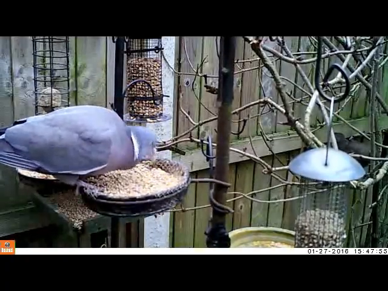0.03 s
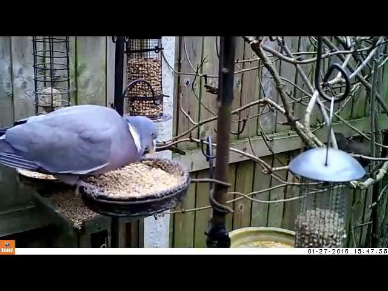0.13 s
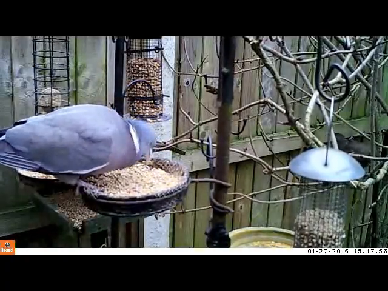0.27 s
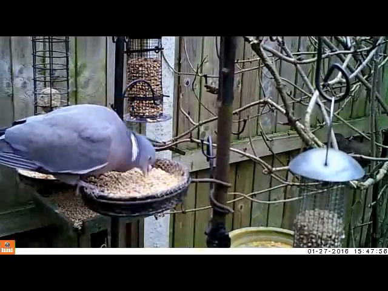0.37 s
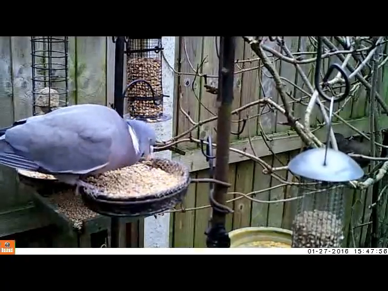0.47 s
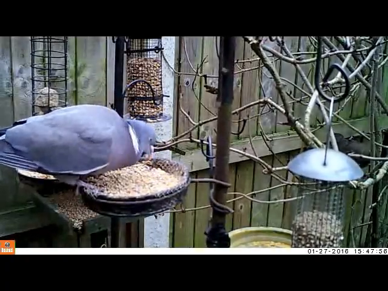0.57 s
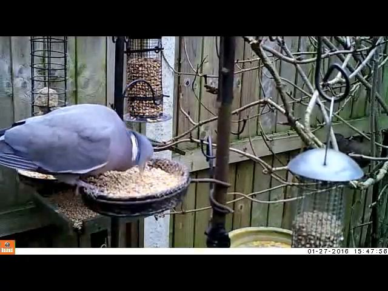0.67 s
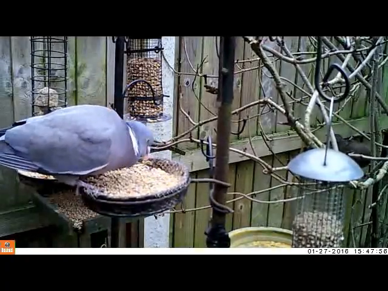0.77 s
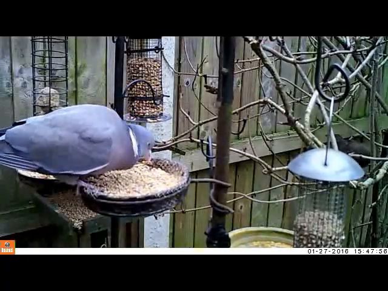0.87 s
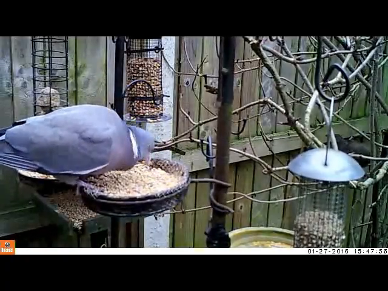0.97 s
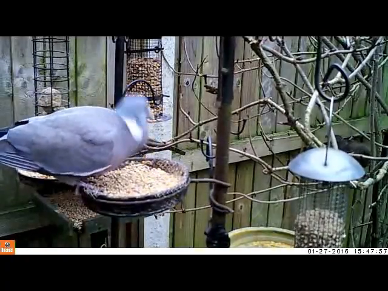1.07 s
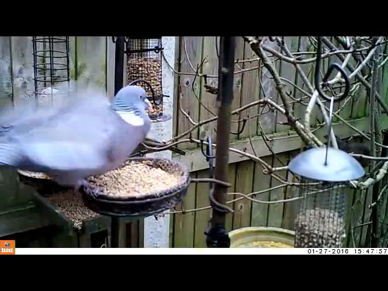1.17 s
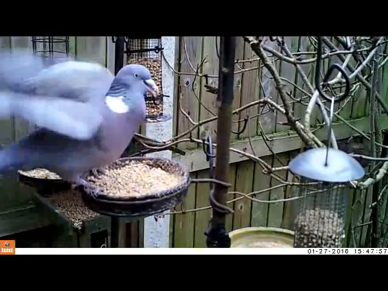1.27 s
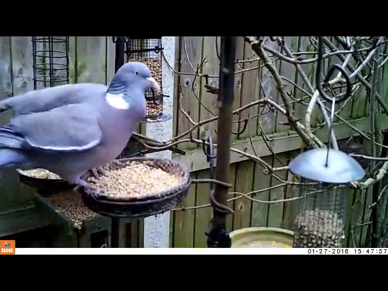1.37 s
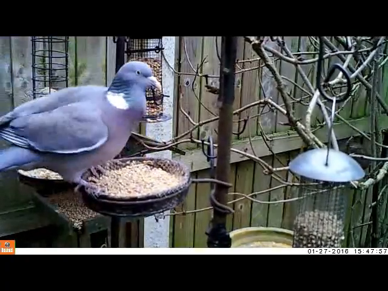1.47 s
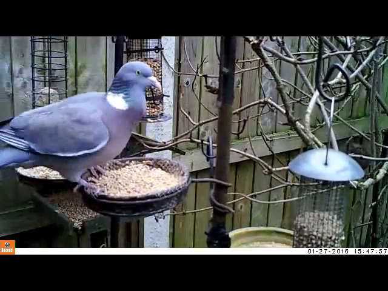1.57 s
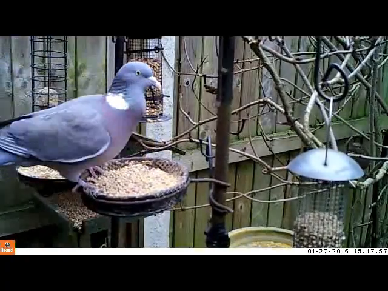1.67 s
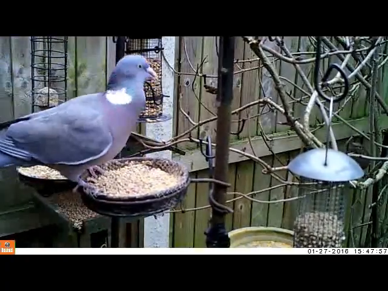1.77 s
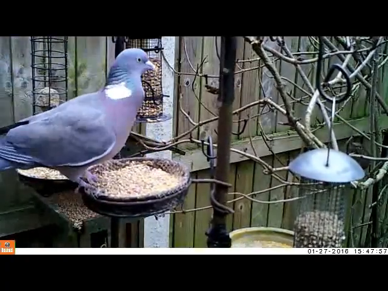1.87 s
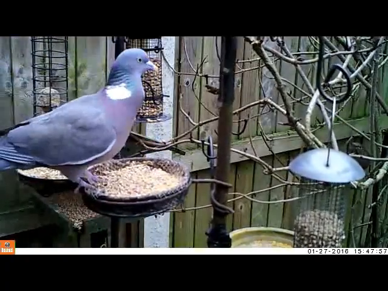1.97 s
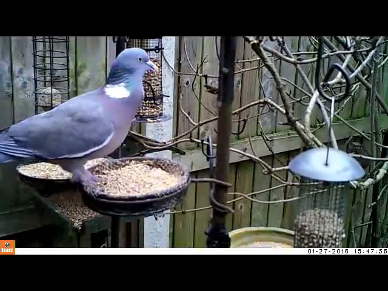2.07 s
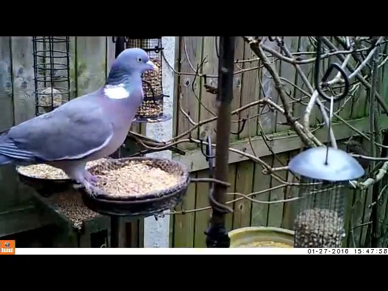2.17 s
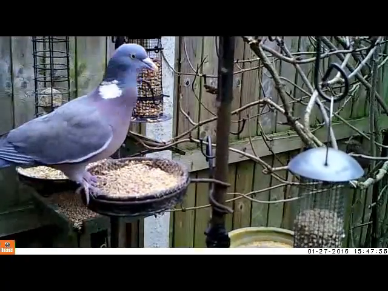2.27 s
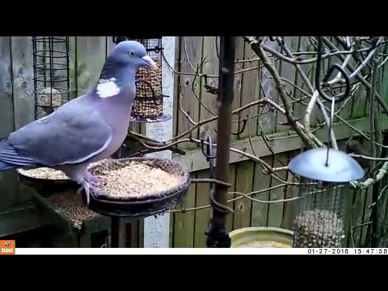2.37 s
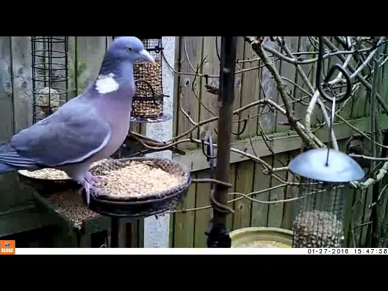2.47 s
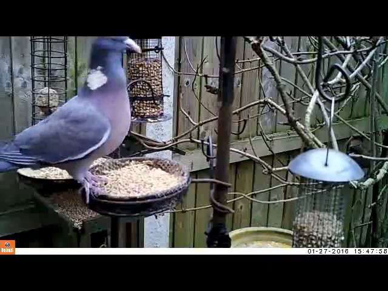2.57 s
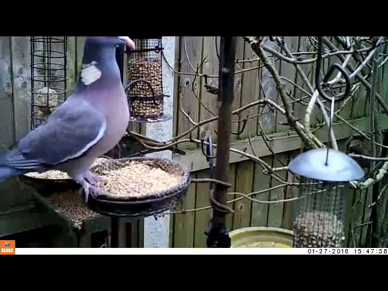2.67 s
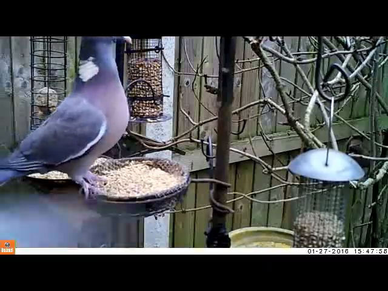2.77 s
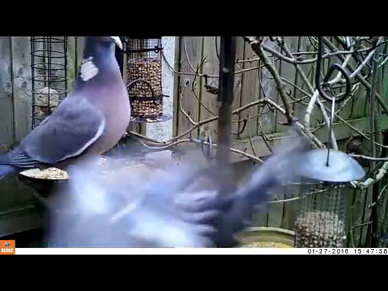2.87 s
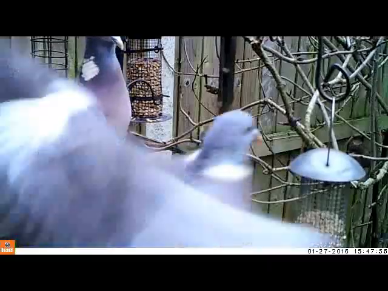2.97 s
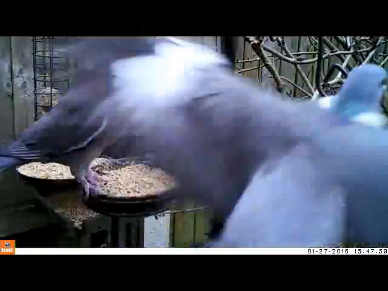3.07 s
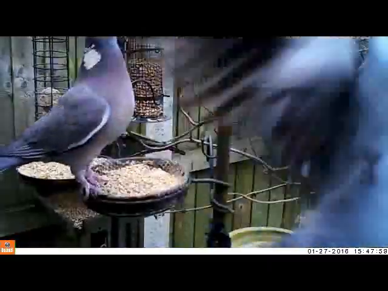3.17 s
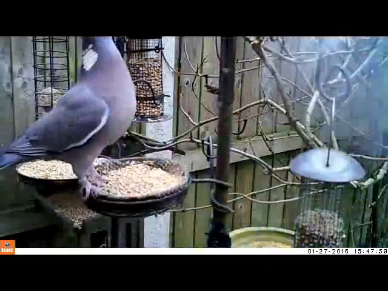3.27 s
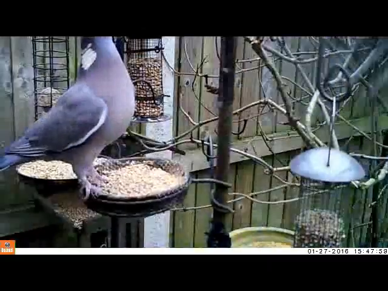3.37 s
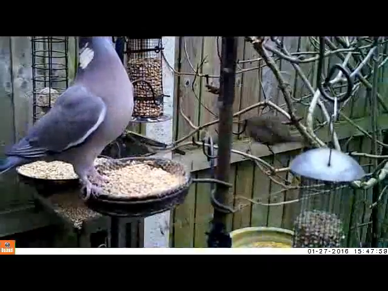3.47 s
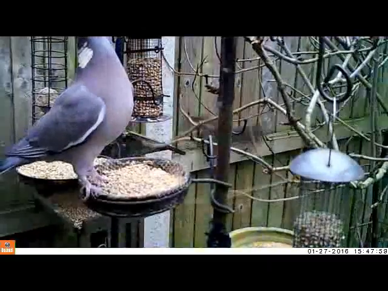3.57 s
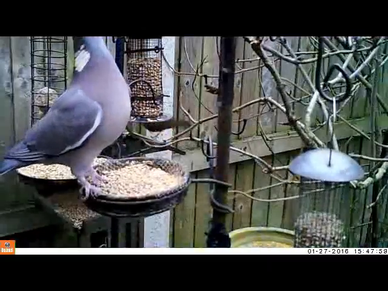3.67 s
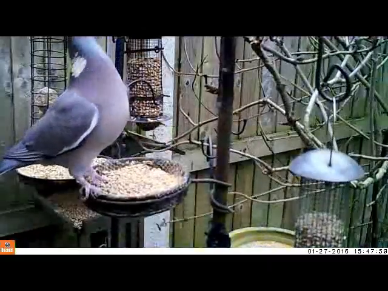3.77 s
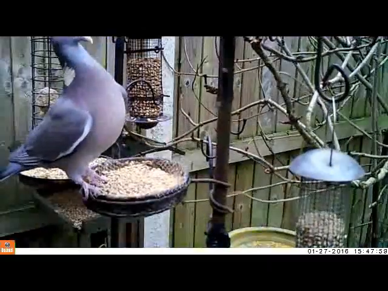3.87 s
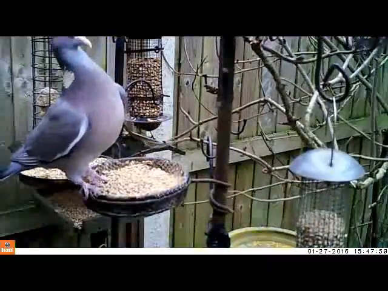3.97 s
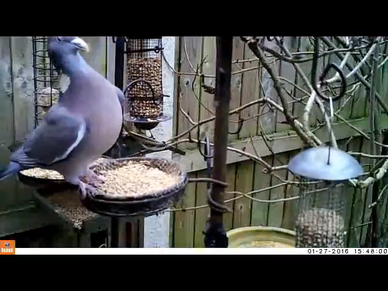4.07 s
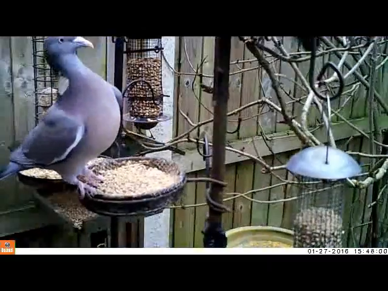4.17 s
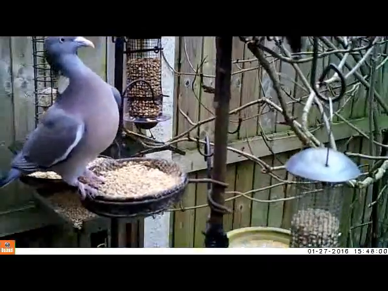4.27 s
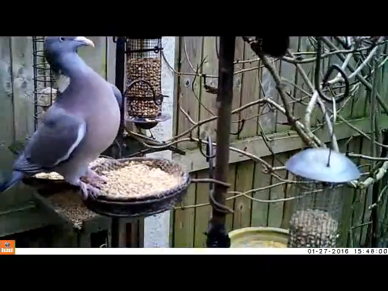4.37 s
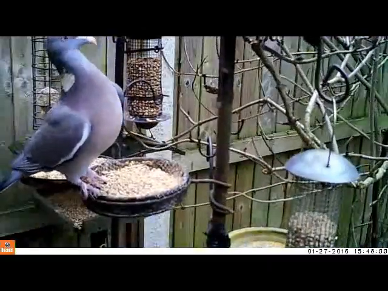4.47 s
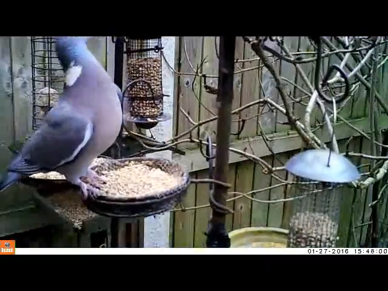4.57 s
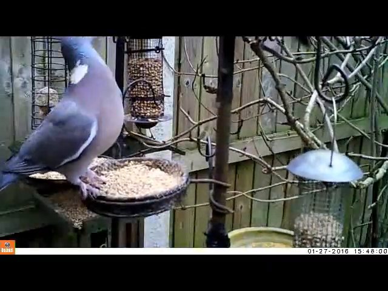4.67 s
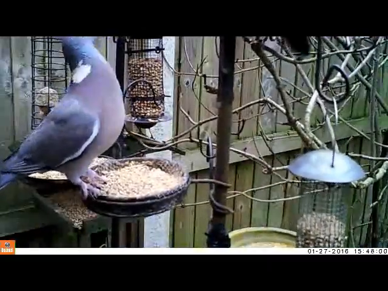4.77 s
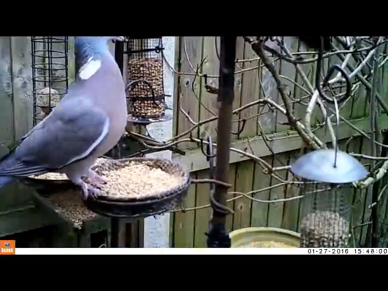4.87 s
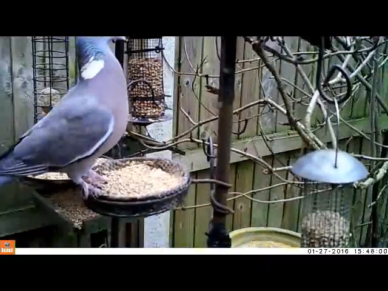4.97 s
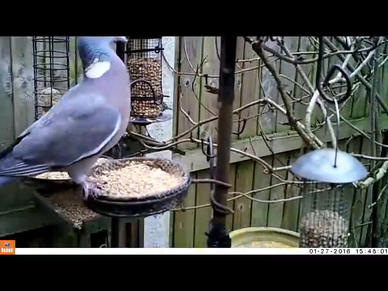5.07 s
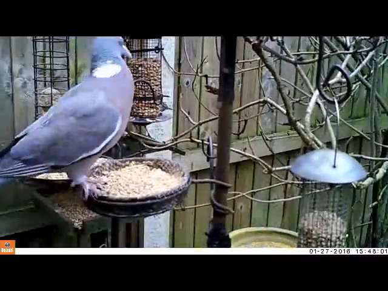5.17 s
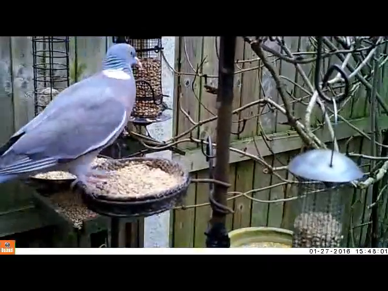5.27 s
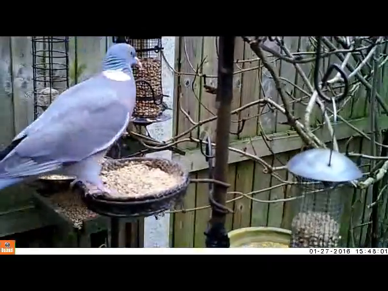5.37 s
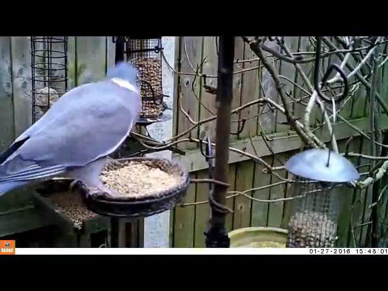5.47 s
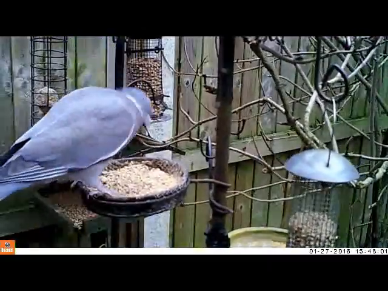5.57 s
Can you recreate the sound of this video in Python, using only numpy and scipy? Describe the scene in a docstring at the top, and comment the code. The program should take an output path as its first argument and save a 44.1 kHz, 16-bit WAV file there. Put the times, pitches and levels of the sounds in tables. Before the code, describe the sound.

A quiet fenced back garden, with steady faint distant town rumble and soft hiss. For the first second a wood pigeon near the microphone pecks seed, making only tiny dry ticks and grainy shifts. From about 1.1 seconds it flaps for balance: quick, soft wingbeats, eight or nine per second, each a breathy swish, papery feather rustle and low air thump, with brief fluttery tones. Firmer claw clicks and scattering seed start near 1.6 seconds. Around 2.7 to 3.6 seconds the strokes become heaviest as a second pigeon passes very close, buffeting the microphone; wing claps crack sharply from 3.0 to 3.75, strongest near 3.3, with crisp quill rattles and hollow slaps. The beats fade by about 4.2. Light claw and seed ticks continue to the end at about 5.5, the wire rim ringing slightly, while a small far bird gives faint, thin high chirps around 4.7 to 5.1.

```python
"""Pigeons at a garden feeder

Close to the microphone a wood pigeon softly pecks seed from a tray, then flaps to keep its balance.
A second pigeon flies close past and away, clapping its wings: strokes are gusts plus shaped noise,
rustle and claps are showers of tiny clicks. Claws tick on the tray, whose wire rim rings as resonators.
Farther off a small bird chirps in wavering sines, over steady noise for distant town rumble and hiss."""
import sys
import numpy as np
from scipy import signal
from scipy.fft import next_fast_len
from scipy.io import wavfile
from scipy.ndimage import uniform_filter1d

SR = 44100
rng = np.random.default_rng(int(sys.argv[2]) if len(sys.argv) > 2 else 0)


def int16_out(signal):
    """Quantize to a 16-bit WAV file."""
    q = np.round(np.clip(np.atleast_2d(signal).T, -1, 1) * 32767)
    wavfile.write(sys.argv[1], SR, q.astype(np.int16))


N = 248724
TIME = np.arange(N) / SR
EDGE_HZ = 10480  # upper edge of the microphone's band

# Spectra are relative: each coloured noise is scaled to rms 1 afterwards.
# distant garden background: (frequency [Hz], density [dB per Hz])
GARDEN_SPECTRUM = [(8.8, -17.5), (15, 8.5), (96, -7.5), (245, -17), (369, -21.5), (816, -28), (910, -26),
                   (1100, -27.5), (1570, -32), (1710, -32.5), (3030, -40.5), (3880, -40.5), (5700, -42),
                   (8820, -42), (10400, -51.5), (13500, -69), (22000, -120)]
# decay of reflections from fence and walls: (frequency [Hz], t60 [s])
YARD_DECAY = [(200, 0.25), (1500, 0.083), (6000, 0.44), (10000, 0.2)]
# thin notes of a small bird farther off:
# (centre time [s], pitch [Hz], level [dB], length [s], pitch drop either side [share; negative rises])
CHIRPS = [(4.686, 5080, -67, .05, 0.095), (4.846, 8200, -53.5, 0.027, -0.0064),
          (4.85, 8970, -57.5, 0.031, .01), (4.894, 4160, -65.5, 0.031, -.03),
          (4.915, 4510, -53.5, .018, .02), (4.97, 5000, -74, .09, .005), (5.12, 9100, -70, .048, .04)]
# beak, claws and seed ticking on the tray, before the tray's level:
# (time [s], tick [dB], shifting seed [dB], seed t60 [s], centre frequency [Hz])
TICKS = [(.099, -69, -68, 0.5, 6840), (0.164, -55, -63, 0.1, 6560), (.276, -70, -69, 0.14, 8000),
         (.4126, -69, -77, .06, 8500), (.4689, -62, -70, .06, 7000), (.560, -70, -64, 0.11, 8000),
         (0.691, -66, -75, .04, 5500), (0.9567, -59, -62, 0.078, 6140), (1.0776, -62, -62, .14, 6200),
         (1.6411, -40, -42, .08, 7500), (1.7623, -49, -41, 0.082, 6900), (1.965, -47, -39.5, 0.06, 7500),
         (2.3528, -45.5, -54, .04, 6960), (2.3670, -43, -42.5, 0.074, 6460), (2.6412, -46, -50, 0.06, 7000),
         (2.914, -46, -46, 0.064, 7100), (2.927, -53, -39.5, 0.072, 7300), (3.935, -54, -47.5, 0.092, 7000),
         (4.052, -52, -45, .05, 7000), (4.179, -52, -47, 0.12, 7140), (4.334, -49.5, -53, 0.094, 6270),
         (4.4407, -43, -43.5, 0.049, 9350), (4.442, -43, -57, 0.38, 4720), (4.5359, -48, -57, 0.14, 5000),
         (4.5805, -56, -65, 0.044, 7500), (4.7990, -61, -55.5, .14, 7260), (4.8370, -63, -53, 0.26, 7100),
         (4.913, -47, -59, 0.09, 5450), (4.9400, -54, -63, 0.2, 6060), (5.0233, -57, -69, .04, 8500),
         (5.062, -56, -56.5, 0.17, 4970), (5.246, -60, -56.5, 0.14, 5260), (5.374, -63, -58, 0.11, 4770),
         (5.387, -51, -56, .09, 7100), (5.4086, -52, -53.5, 0.083, 7700), (5.4620, -57, -63, .03, 8000),
         (5.4827, -50, -53, 0.094, 6850)]
# spectrum of a husk: (frequency [share of the tick's centre], density [dB per Hz])
HUSK = [(1 / 10, -24), (0.33, -15), (0.68, -7), (1, 0), (1.4, -6), (2, -13)]
# ringing of the tray's wire rim: (frequency [Hz], gain at resonance [dB], t60 [s])
RIM_MODES = [(2400, -4, .06), (3520, -3, 0.046), (4700, -2, 0.22), (6390, 7.5, 0.027)]
# wing strokes; rustle and rush are before their layers' levels:
# (push time [s], air push [dB], push length [s], swish [dB], rustle [dB], air rush [dB], sweep length [s])
STROKES = [(1.116, -26.0, 0.016, -61, -54.5, -70, 0.032), (1.24, -19.5, 0.013, -44, -51, -65, 0.05),
           (1.348, -17.5, 0.011, -40.5, -49.0, -58, 0.043),
           (1.454, -15.5, 0.012, -42.5, -47.5, -49.5, 0.074), (1.57, -18.5, 0.017, -50.5, -49, -54, 0.071),
           (1.711, -19.5, 0.013, -44, -49.5, -59, 0.058), (1.843, -21.5, 0.018, -52.5, -55.5, -56.0, 0.1),
           (1.94, -21.5, 0.011, -50.5, -52, -67, 0.037), (2.043, -21, 0.0069, -51.5, -50.0, -55, 0.08),
           (2.155, -20.5, 0.0092, -51.5, -48, -58.5, 0.073),
           (2.278, -24.0, 0.015, -60, -51.5, -55.0, 0.087), (2.418, -24, 0.016, -58, -52.5, -57, 0.038),
           (2.569, -19.5, 0.018, -47.5, -52.5, -64, 0.041),
           (2.702, -14.5, 0.018, -46.5, -49.0, -54.5, 0.048), (2.832, -16, 0.022, -45.5, -49.0, -57, 0.046),
           (2.95, -11.5, 0.015, -51.5, -51.5, -56, 0.015), (3.069, -15.5, 0.018, -50, -50, -66, 0.09),
           (3.183, -12.5, 0.016, -50, -51.5, -58.5, 0.018), (3.269, -12.5, 0.0066, -44, -49.5, -62.5, 0.11),
           (3.37, -14, 0.0067, -41.5, -45.5, -54.5, 0.057), (3.477, -15, 0.0092, -43, -48, -66, 0.067),
           (3.582, -21.5, 0.012, -46.0, -52, -59.5, 0.084), (3.698, -21.0, 0.01, -47.0, -50.5, -57.5, 0.1),
           (3.795, -33, 0.012, -57, -52, -58.5, 0.089), (3.853, -22.5, 0.015, -54, -52.5, -55, 0.025),
           (3.978, -25, 0.015, -60, -56.5, -61, 0.037), (4.09, -24.5, 0.013, -55, -54, -59, 0.076),
           (4.22, -26.0, 0.023, -60, -60.5, -64, 0.078)]
# eddies the passing bird leaves at the microphone: (time [s], level [dB], length [s])
EDDIES = [(3.291, -13, 0.019), (3.396, -12.5, 0.015), (3.504, -15, 0.0195), (3.621, -19, 0.017),
          (3.734, -18.5, 0.019)]
# low buffeting at the microphone: (frequency [Hz], density [dB per Hz])
BUFFET = [(10, -19.0), (40, 13.5), (110, -10.5), (250, -20), (1000, -66.0)]
# swish of the moving wing: (frequency [Hz], density [dB per Hz])
SWISH_SPECTRUM = [(60, 9.5), (180, -2), (300, -4), (700, -5.5), (1100, -5.5), (1700, -13.5), (3200, -16),
                  (6000, -17), (10300, -29)]
# air rushing through the spread wings: (frequency [Hz], density [dB per Hz])
RUSH_SPECTRUM = [(100, -15.5), (300, -1), (550, 1.5), (900, 1.5), (1250, -8.5), (1700, -8.5), (3000, -7),
                 (8000, -23.5)]
# loose rustle between strokes, before the rustle's level: (time [s], level [dB])
RUFFLE = [(.97, -71), (1.2, -50), (2.2, -55), (2.48, -63), (3.0, -59), (3.7, -59.5), (4.2, -63.5),
          (4.62, -68.5)]
# feather rustle: (frequency [Hz], density [dB per Hz])
FEATHER_SPECTRUM = [(150, -24.5), (400, -7.5), (800, -8), (1500, -9.5), (2400, -10.5), (3100, -8.5),
                    (4200, -7), (5300, -7), (6200, -2), (8000, 0.5), (10300, -9)]
# feathers that flutter or whistle briefly: (centre time [s], pitch [Hz], level [dB], length [s])
FLUTTERS = [(1.376, 370, -54, 0.037), (1.409, 3080, -56, 0.044), (1.441, 1205, -49, 0.056),
            (1.541, 3030, -56, 0.037), (1.733, 468.5, -51, 0.048), (1.811, 636, -54, 0.035),
            (1.931, 597, -51, 0.029), (2.137, 3220, -59, .05), (2.243, 2970, -60, 0.043),
            (2.272, 795, -52.5, .025), (2.4, 745, -56, 0.05), (2.816, 3080, -56.5, 0.039),
            (2.948, 2900, -59.5, 0.03), (3.256, 920, -52.5, .03), (3.361, 910, -49.5, .03),
            (3.461, 360, -40.5, 0.036), (3.56, 375, -44.5, 0.031), (3.675, 910, -53, 0.028),
            (3.783, 875, -56, 0.0303), (3.865, 800, -55, .025), (4.076, 2970, -61, 0.037)]
# wing claps: (time [s], crack [dB], quill rattle [dB], rattle t60 [s], hollow slap [dB])
CLAPS = [(2.961, -33, -39.5, 0.12, -40.5), (3.0917, -34, -48, 0.061, -39), (3.311, -37, -27, 0.026, -35),
         (3.3151, -22, -26, 0.07, -76), (3.3224, -21.5, -27.5, 0.12, -79), (3.4264, -32, -37, 0.042, -73),
         (3.5193, -37, -30.5, 0.033, -34.5), (3.5261, -41, -27.5, 0.043, -49),
         (3.635, -32.5, -27, 0.043, -71), (3.638, -33.5, -65, .08, -34), (3.749, -39, -51, 0.053, -32.5),
         (3.751, -30, -39, 0.066, -56)]
# crack and quill rattle of a clap: (frequency [Hz], density [dB per Hz])
CRACK_SPECTRUM = [(200, -29), (1600, -16.5), (3000, -15.5), (3800, -16), (5000, -6), (6400, 2), (7500, 0),
                  (9000, 1), (10300, -9.5)]
# air slapped between the wings: (frequency [Hz], density [dB per Hz])
SLAP_SPECTRUM = [(100, 8.5), (400, 4), (1000, 4.5), (1600, 2.5), (2500, -3.5), (3400, 3.5), (5000, 1.5),
                 (10000, -21)]


def amp(db):
    """Turns decibels into gain."""
    return 10 ** (np.asarray(db) / 20)


def unit(x):
    """Scales to rms 1."""
    return x / np.sqrt(np.mean(x ** 2) + 1e-20)


def read(points, hz):
    """Reads a table along a log-frequency axis."""
    f, value = np.transpose(points)
    return np.interp(np.log(hz + 1), np.log(f + 1), value)


def add(mix, s, sound):
    """Mixes a sound in at time s."""
    part = mix[max(round(s * SR), 0):][:len(sound)]
    part += sound[:len(part)]


def colour(x, spectrum):
    """Gives x a spectrum at rms 1, with minimum phase so that clicks keep a sharp start."""
    size = next_fast_len(len(x))
    hz = abs(np.fft.fftfreq(size, 1 / SR))
    log_gain = np.log(amp(read(spectrum, hz)))
    minimum_phase = np.exp(np.conj(signal.hilbert(log_gain)))
    response = minimum_phase * (hz < EDGE_HZ + 500)
    coloured = np.fft.ifft(np.fft.fft(x, size) * response).real
    return unit(coloured[:len(x)])


def noise(length, spectrum):
    """Makes steady coloured noise of rms 1."""
    return colour(rng.standard_normal(length), spectrum)


def wander(rate_hz):
    """Draws a random curve of rms 1, with two knots per cycle of rate_hz."""
    knots = rng.standard_normal(8192)
    return unit(np.interp(TIME * 2 * rate_hz, np.arange(len(knots)), knots))


def grains(length, per_s, spread_db):
    """Makes a random train of tiny clicks of uneven size and either sign."""
    size = amp(spread_db * np.minimum(rng.exponential(1, length), 4))
    sign = rng.choice([-1., 1.], length)
    present = rng.random(length) < per_s / SR
    return unit(sign * size * present)


def snap(spectrum, decay_s):
    """Makes a sharp click and brief splinter, with the energy of two milliseconds at rms 1."""
    t = TIME[:2048]
    impact = .35 * rng.standard_normal(len(t)) * np.exp(-t / decay_s)
    impact[0] = 1
    return colour(impact, spectrum) * np.sqrt(.002 * SR / len(t))


def scatter(spectrum, t60, per_s, spread_db):
    """Makes a dying shower of tiny clicks."""
    t = TIME[:SR // 4]
    fade = 1000 ** (-t / t60) * (1 - np.exp(-t / .001))
    return colour(grains(len(t), per_s, spread_db), spectrum) * fade


def tone(s, hz, length_s, fall, waver, rough):
    """Makes a brief wavering note that swells around time s while its pitch slides."""
    out, on = np.zeros(N), abs(TIME - s) < 2 * length_s
    u = (TIME[on] - s) / length_s
    pitch = hz * (1 - fall * np.tanh(2 * u) + waver * wander(rate_hz=440)[on])
    sine = np.sqrt(2) * np.sin(2 * np.pi * np.cumsum(pitch) / SR)
    out[on] = np.exp(-8 * u ** 2) * sine * (1 + rough * wander(rate_hz=190)[on])
    return out


def sweep(start, end, attack_s, release_s):
    """Rises to full level at start, holds until end, then dies away."""
    early, late = np.maximum(start - TIME, 0), np.maximum(TIME - end, 0)
    return np.exp(-np.minimum(early / attack_s + late / release_s, 20))


def garden(level_db=-48, swell_db=0.74):
    """Distant town rumble and a faint even hiss: coloured noise that swells gently."""
    return noise(N, GARDEN_SPECTRUM) * amp(level_db + swell_db * wander(rate_hz=3.4))


def yard(x, first_s=.005):
    """Sparse reflections from the fence and walls, each band dying at its own speed."""
    length = SR // 2
    taps = grains(length, per_s=2500, spread_db=2) * (TIME[:length] > first_s)
    hz, t, bands = signal.stft(taps, SR, nperseg=256)
    fade = amp(-60 * t / read(YARD_DECAY, hz)[:, None])
    tail = signal.istft(bands * fade, SR, nperseg=256)[1]
    return signal.fftconvolve(x, tail / np.linalg.norm(tail))[:N]


def songbird():
    """High, slurred, husky notes from across the garden: sines of unsteady pitch and loudness."""
    out = np.zeros(N)
    for s, hz, db, length_s, fall in CHIRPS:
        out += amp(db) * tone(s, hz, length_s, fall, waver=260 / hz, rough=.6)  # 260 Hz rms waver
    return out


def tray():
    """A hard tip strikes seed and rim with a click; the husks around it shift in a shower of grains."""
    out = np.zeros(N)
    for s, tick_db, seed_db, t60, centre_hz in TICKS:
        husk = [(share * centre_hz, db) for share, db in HUSK]
        add(out, s, amp(tick_db) * snap(husk, decay_s=0.00087))
        add(out, s, amp(seed_db) * scatter(husk, t60, per_s=6000, spread_db=2))
    return out


def rim(x):
    """The wire rim rings on after each blow: damped resonators added to the plain tick."""
    out = x.copy()
    for hz, db, t60 in RIM_MODES:
        r = 1000 ** (-1 / (t60 * SR))  # decay per sample
        pole = r * np.exp(2j * np.pi * hz / SR)
        out += amp(db) * 2 * signal.lfilter([1 - r], [1, -pole], x).real
    return out


def gust(length_s):
    """Pressure of a passing wing: it builds, drops into suction at 0.25 s, and recovers."""
    u = (TIME[:SR // 2] - .25) / length_s
    return (u ** 2 - 1) / (1 + u ** 2 / 3) ** 3


def air(lead_s=0.016, swell_s=0.016):
    """Every stroke pushes air at the microphone, just after the swish of its fastest part."""
    push, speed = np.zeros(N), np.zeros(N)
    for s, push_db, length_s, swish_db, *_ in STROKES:
        add(push, s - .25, amp(push_db) * gust(length_s))
        speed += amp(swish_db) / (1 + ((TIME - s + lead_s) / swell_s) ** 2)
    for s, push_db, length_s in EDDIES:
        add(push, s - .25, amp(push_db) * gust(length_s))
    strength = np.sqrt(abs(uniform_filter1d(push ** 2, size=3000)))  # local rms over 68 ms
    buffet = amp(-15.5) * strength * noise(N, BUFFET)
    swish = noise(N, SWISH_SPECTRUM) * amp(3.8 * wander(rate_hz=30))
    return push + buffet + speed * swish


def rush(level_db=0.3, flicker_db=1.9):
    """A soft, uneven rush of air through the flight feathers in each stroke."""
    slowing_s, attack_s, release_s = 0.021, 0.034, 0.045  # dies away as the wing slows, before the push
    power = np.zeros(N)
    for s, _, _, _, _, db, sweep_s in STROKES:
        power += (amp(db) * sweep(s - sweep_s, s - slowing_s, attack_s, release_s)) ** 2
    return np.sqrt(power) * noise(N, RUSH_SPECTRUM) * amp(level_db + flicker_db * wander(rate_hz=45))


def rustle(level_db=-0.17, flicker_db=1.7, crackle_db=-8):
    """In each stroke barbs catch and slip by the thousand; stiff quills add a sparser crackle."""
    attack_s, overrun_s, release_s = .022, .014, 0.028  # sliding lasts the sweep and just past the push
    power = amp(np.interp(TIME, *np.transpose(RUFFLE), left=-120, right=-120)) ** 2
    for s, _, _, _, db, _, sweep_s in STROKES:
        power += (amp(db) * sweep(s - sweep_s, s + overrun_s, attack_s, release_s)) ** 2
    barbs = grains(N, per_s=9000, spread_db=2.5)
    quills = grains(N, per_s=160, spread_db=2)
    feathers = colour(barbs + amp(crackle_db) * quills, FEATHER_SPECTRUM)
    clumps = amp(level_db + flicker_db * wander(rate_hz=65))
    return np.sqrt(power) * feathers * clumps


def flutters(fall=.06, waver=.03, rough=0.43):
    """A feather vibrates for a moment, its pitch sagging as the wing slows."""
    return sum(amp(db) * tone(s, hz, length_s, fall, waver, rough) for s, hz, db, length_s in FLUTTERS)


def claps():
    """Wings meet: a crack, the slap of trapped air, and quills rattling past each other."""
    out = np.zeros(N)
    length, slap_t60 = SR // 4, .035
    for s, crack_db, rattle_db, t60, slap_db in CLAPS:
        add(out, s, amp(crack_db) * snap(CRACK_SPECTRUM, decay_s=.0004))
        add(out, s, amp(rattle_db) * scatter(CRACK_SPECTRUM, t60, per_s=8000, spread_db=2))
        puff = noise(length, SLAP_SPECTRUM) * 1000 ** (-TIME[:length] / slap_t60)
        add(out, s, amp(slap_db) * puff)
    return out


def scene():
    """Sets the garden, the far bird, the tray and the close wings in the fenced yard."""
    far = songbird()
    near = amp(-1.5) * rim(tray()) + rustle() + flutters() + claps()
    reflections = yard(amp(-14.5) * near + amp(-9.5) * far)
    return (garden() + far + reflections + near + air() + rush())[None]


def record(dry):
    """The small microphone's band limit: a steep low-pass filter."""
    low_pass = signal.firwin(401, EDGE_HZ, window=("kaiser", 8), fs=SR)
    return signal.oaconvolve(dry, low_pass[None], "same")


dry = scene()
out = record(dry)
int16_out(out)
```